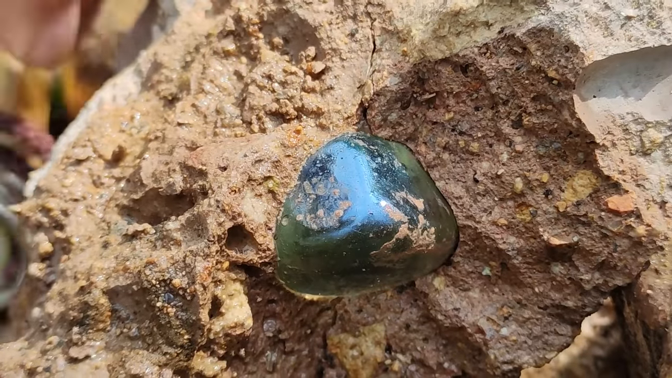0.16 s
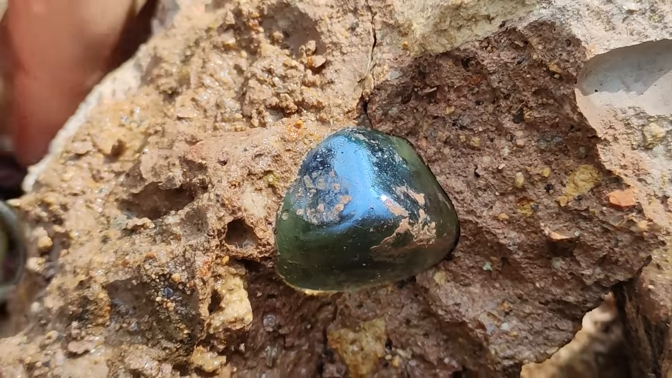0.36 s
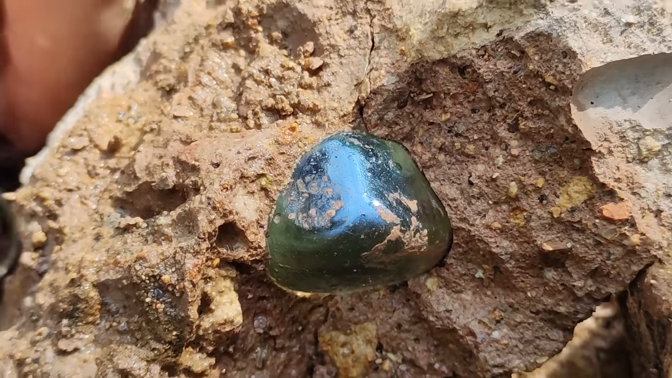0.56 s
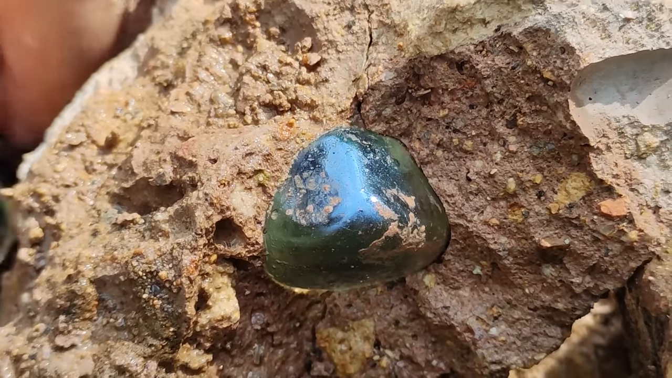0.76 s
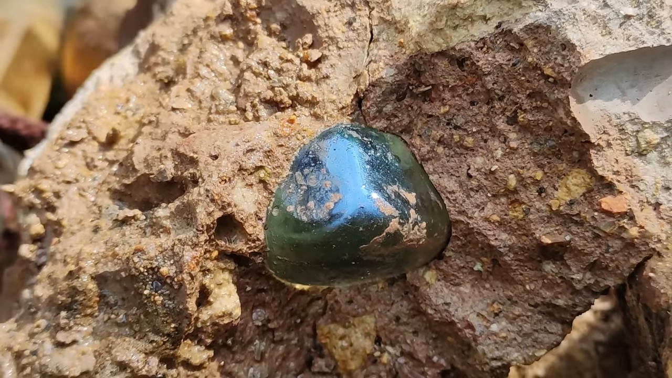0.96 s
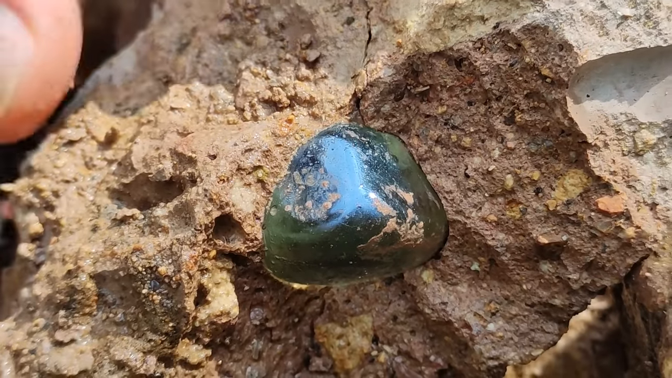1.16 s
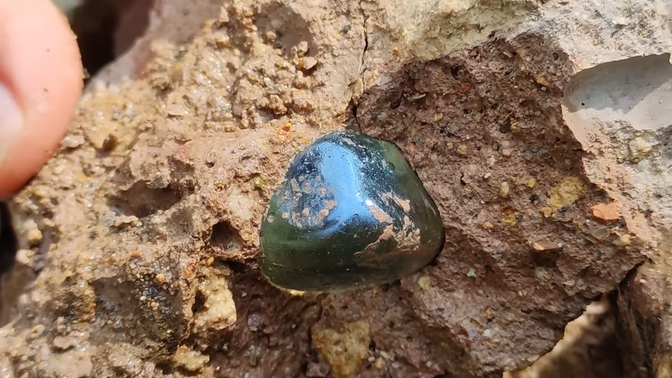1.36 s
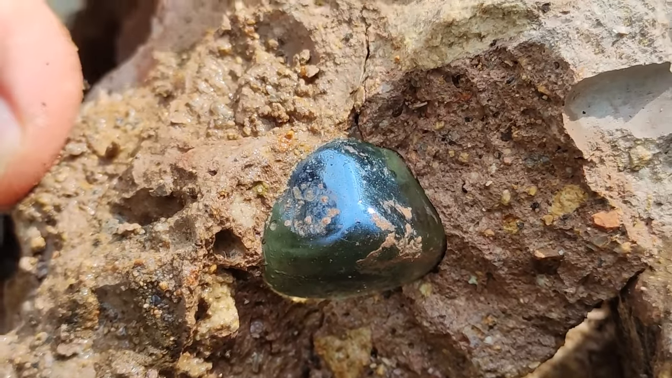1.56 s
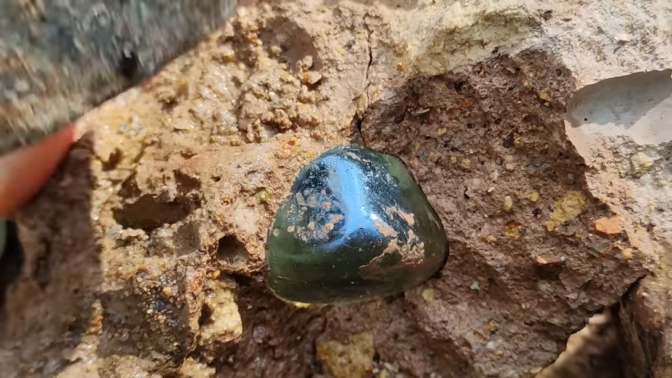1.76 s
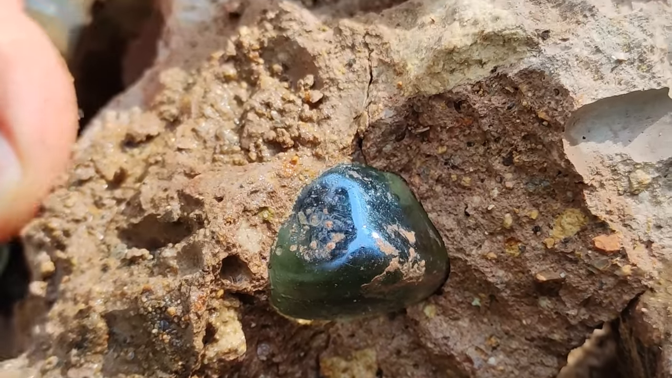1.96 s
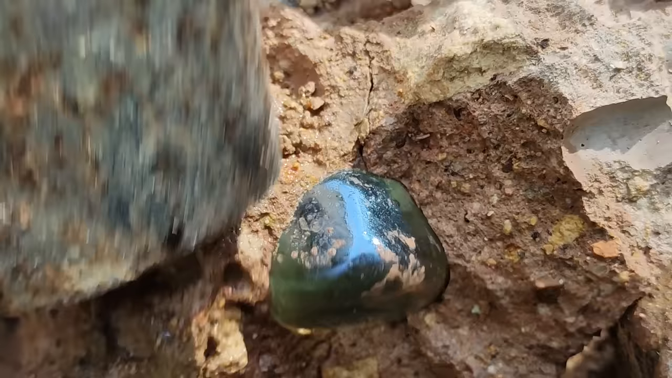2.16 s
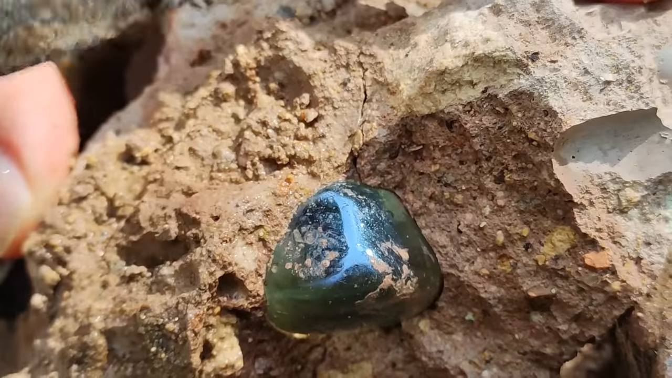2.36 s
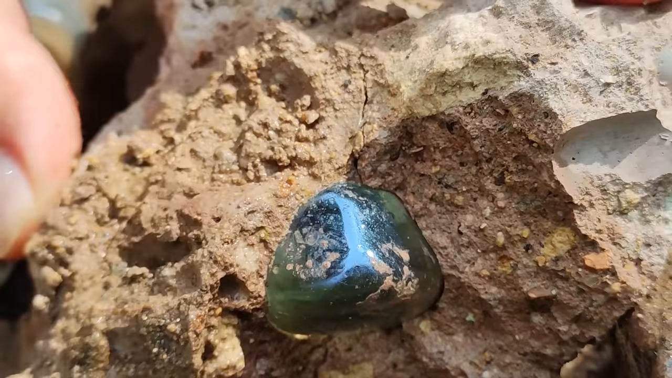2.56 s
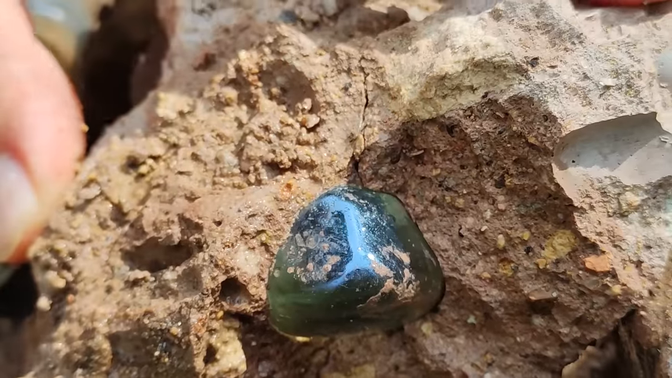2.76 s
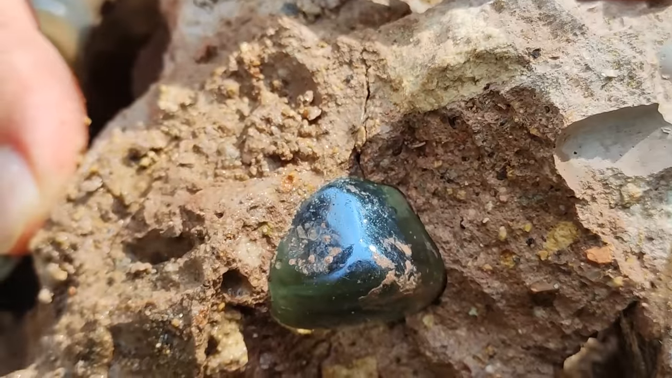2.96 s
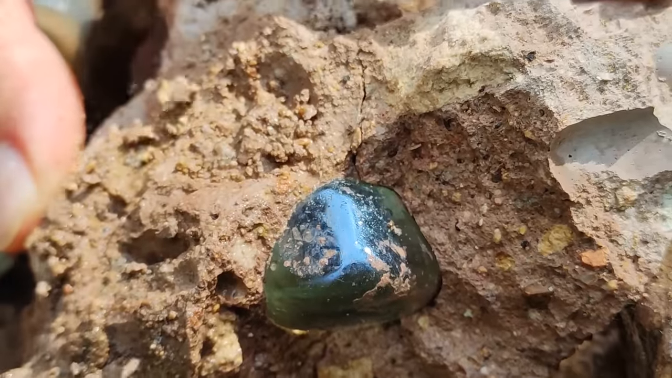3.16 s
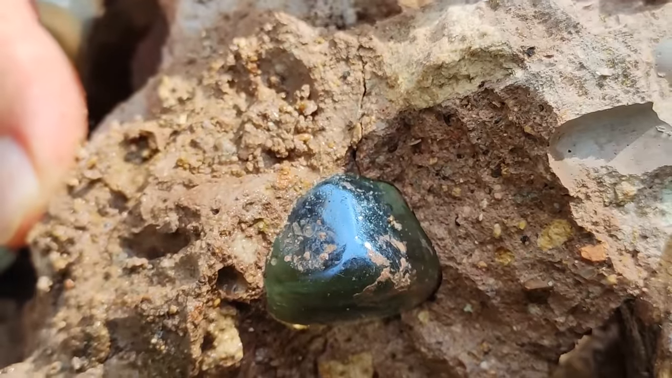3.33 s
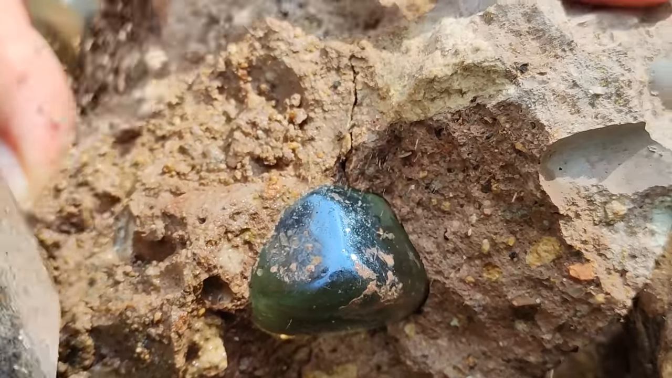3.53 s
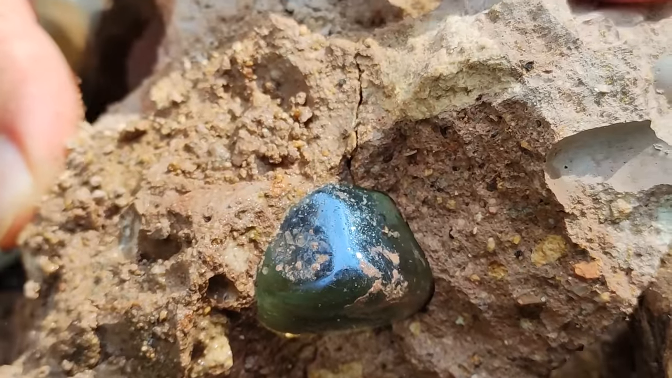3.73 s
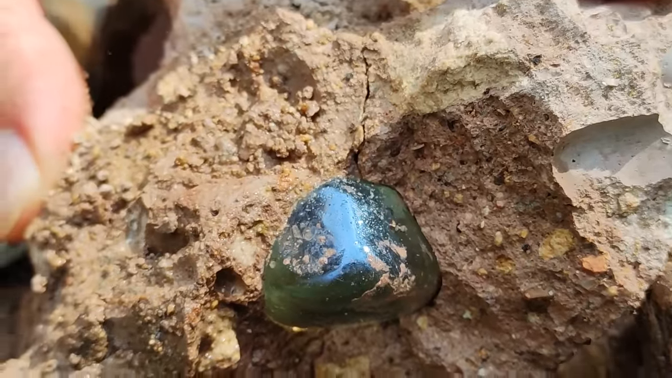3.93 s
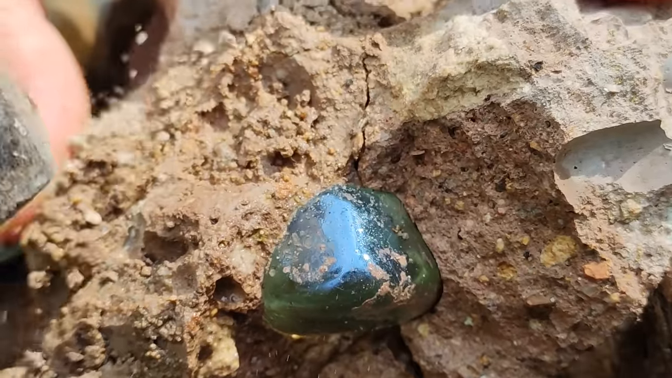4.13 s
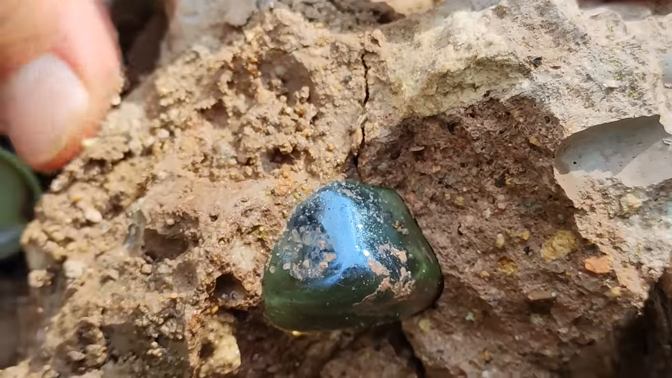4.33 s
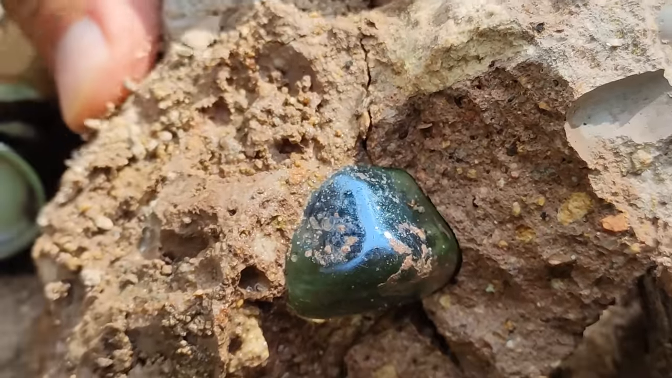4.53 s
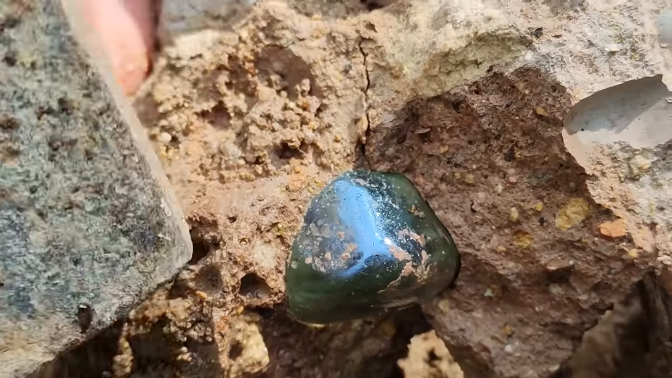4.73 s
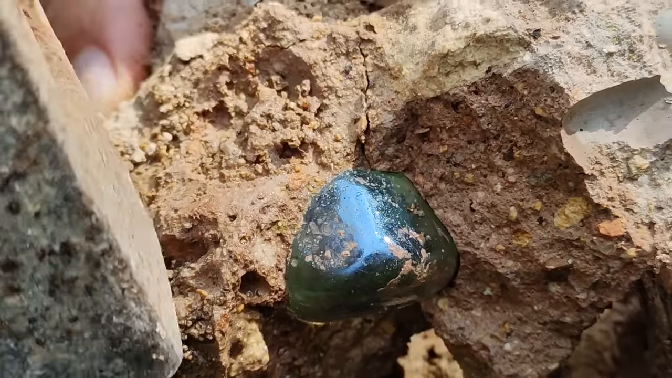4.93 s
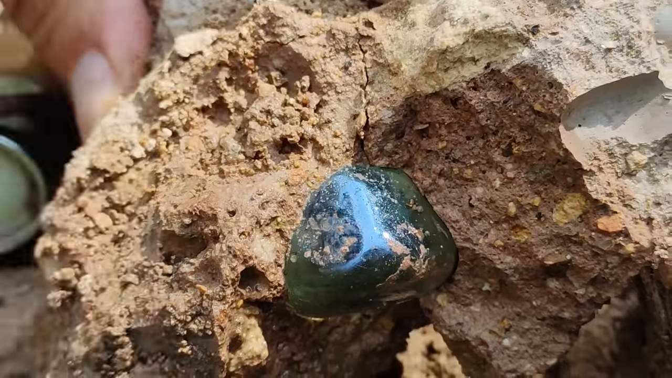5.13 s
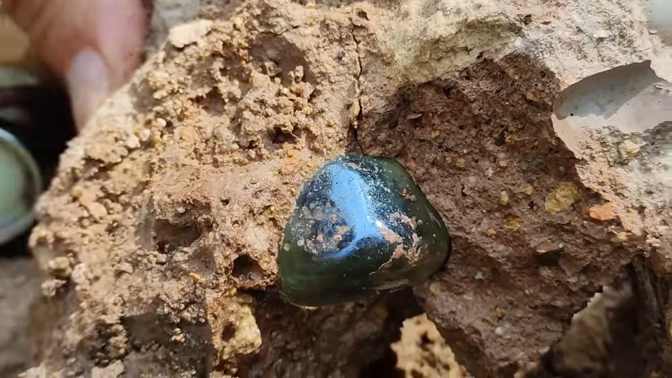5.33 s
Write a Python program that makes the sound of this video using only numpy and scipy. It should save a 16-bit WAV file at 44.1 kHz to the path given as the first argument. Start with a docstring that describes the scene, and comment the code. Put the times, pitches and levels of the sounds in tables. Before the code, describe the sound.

A steel hammer knocks repeatedly on crumbly rock outdoors, with grit and chips falling and faint birds in the distance.

```python
"""Hammer on crumbly rock

Outdoors, close to a two-port phone microphone, a steel hammer knocks on a crumbly rock held by hand.
Each blow crushes the surface, rings rock and steel, thumps the ground and sheds grit. Before the blows
something small and hard clicks. Chips fall, the hand rustles, and birds call in the distance over a
low rumble, a faint drone and an airy hiss."""
import sys
import numpy as np
from scipy import signal
from scipy.fft import rfft, irfft
from scipy.io import wavfile
from scipy.ndimage import uniform_filter1d

SR = 44100
rng = np.random.default_rng(int(sys.argv[2]) if len(sys.argv) > 2 else 0)


def store_wav(level_fs):
    """Save 16-bit WAV to argv[1]."""
    pcm = np.round(np.clip(np.atleast_2d(level_fs), -1, 1) * 32767)
    wavfile.write(sys.argv[1], SR, pcm.T.astype(np.int16))


N = 242054
T = np.arange(N) / SR
# The right port is further from the rock; long waves bend round the phone and reach it sooner.
PORT_LAG_MS, KNOCK_LAG_MS, LONG_WAVE_LAG_MS = .45, .24, .2


def undb(db):
    """Decibels to amplitude."""
    return 10 ** (np.asarray(db) / 20)


def level(x, db):
    """Set the rms level."""
    return x * undb(db) / np.sqrt(np.mean(x ** 2))


def peak(x, db):
    """Set the peak level."""
    return x * undb(db) / np.abs(x).max()


def band(x, lo_hz, hi_hz):
    """Band-pass with gentle skirts."""
    sos = signal.butter(2, [lo_hz, min(hi_hz, .45 * SR)], "bandpass", fs=SR, output="sos")
    return signal.sosfilt(sos, x)


def cut(x, order, hz, kind):
    """Gentle low-pass or high-pass."""
    return signal.sosfilt(signal.butter(order, hz, kind, fs=SR, output="sos"), x)


def coloured(points):
    """Noise whose spectrum follows (Hz, dB) points."""
    hz, db = np.transpose(points)
    f = np.maximum(np.arange(N // 2 + 1) * SR / N, 1)
    return irfft(rfft(rng.standard_normal(N)) * undb(np.interp(np.log(f), np.log(hz), db)), N)


def walk(rate, size=N):
    """Smooth wander: random values held 1 / rate s and slewed twice."""
    hold = int(SR / rate)
    steps = np.repeat(rng.standard_normal(size // hold + 1), hold)
    return uniform_filter1d(uniform_filter1d(steps, hold), hold)[:size]


def ring(push, modes):
    """A push rings decaying (Hz, dB, t60 s) modes of alternating polarity."""
    t, out = T[:len(push)], 0
    for k, (hz, db, t60) in enumerate(modes):
        mode = signal.fftconvolve(push, np.sin(2 * np.pi * hz * t) * 1000 ** (-t / t60))[:len(push)]
        out = out + (-1) ** k * level(mode, db)
    return out


def add(out, s, left, right, pan_db, lag_ms=PORT_LAG_MS):
    """Place a near sound: pan_db louder at the left port, lag_ms later at the right."""
    for ch, (x, at, db) in enumerate([(left, s, pan_db / 2), (right, s + lag_ms / 1000, -pan_db / 2)]):
        i = int(at * SR)
        n = max(min(len(x), N - i), 0)
        out[ch, i:i + n] += undb(db) * x[:n]


def crush(t, ms):
    """Contact force: loose grains yield, a sharp touch follows, the surface gives way in fading jolts."""
    fade = np.exp(-t / (ms / 1000) - (t / (1.5 * ms / 1000)) ** 4)
    jolts = rng.standard_normal(len(t)) * fade * (1 - np.exp(-(t / .0006) ** 2))
    jolts[int(.0007 * SR)] = 5.  # the sharp touch
    return jolts


def rumble():
    """A low, unsteady rumble, nearly alike at both ports."""
    # Each row: time in seconds, level in dB.
    swells = [(0.0, -54.5), (2.0, -55), (2.75, -50.5), (3.24, -49), (3.639, -52), (4.16, -47), (4.43, -52),
              (4.851, -51), (5.49, -54.5)]
    # Each row: frequency in Hz, spectral level in dB.
    colour = [(15, -49.5), (25, 2.5), (102, -3), (134, -4.5), (162, -8.5), (365, -24.5), (400, -29),
              (520, -50.5), (880, -120)]
    s, db = np.transpose(swells)
    mid, side = (level(coloured(colour), 0) for _ in range(2))
    width = undb(-14.5) * side * np.array([[1], [-1]])
    return (mid * undb(2.4 * walk(15)) + width) * undb(np.interp(T, s, db))


def drone():
    """A faint, wavering hum with a trace of its octave."""
    # Each row: time in seconds, pitch in Hz, level in dB.
    glide = [(3.1, 97, -80.5), (3.43, 106.8, -54), (3.6, 149, -55), (4.0, 143.3, -84), (4.15, 136, -50.5),
             (4.75, 131, -53.5), (4.85, 96.5, -51.5), (5.1, 97.6, -70), (5.2, 99, -81)]
    s, hz, db = np.transpose(glide)
    phase = 2 * np.pi * np.cumsum(np.interp(T, s, hz) * (1 + .016 * walk(14))) / SR
    return undb(np.interp(T, s, db) + 2 * walk(4)) * (np.sin(phase) + .043 * np.sin(2 * phase))


def air():
    """Wide outdoor hiss: long waves are alike at both ports, short ones are unrelated."""
    # Each row: frequency in Hz, spectral level in dB.
    colour = [(120, -33.5), (200, -3.5), (317, -10.5), (513, -6), (1090, -13.5), (1900, -13.5),
              (2290, -12.5), (3190, -17), (7000, -25.5), (14500, -27.5), (15600, -26), (16500, -43.5)]
    lows = cut(coloured(colour), 1, 600, "lowpass")
    highs = np.array([cut(coloured(colour), 1, 500, "highpass") for _ in range(2)])
    # each octave flickers on its own
    patchy = sum(band(highs, hz, 2 * hz) * (-1) ** k * undb(1.5 * walk(15))
                 for k, hz in enumerate(500 * 2 ** np.arange(5)))
    return level(lows + patchy, -60.5) * undb(1.2 * walk(3))


def birds():
    """Slurred, rough whistles to the right, smeared by echoes from the trees, over distant chatter."""
    # Each row: start in seconds, length in seconds, opening pitch in Hz, level at the bird in dB.
    notes = [(.01, .05, 3000, -61), (.24, .025, 4050, -62), (.255, .07, 3000, -57), (.31, .07, 3200, -60),
             (.33, .06, 2500, -59), (.39, .03, 2620, -60), (.43, .035, 2180, -60), (.635, .045, 2420, -58),
             (.9, .02, 3950, -61), (.925, .06, 2900, -59), (.97, .06, 3220, -62), (1.13, .09, 3140, -57),
             (1.22, .06, 3030, -58), (1.3, .05, 2420, -58), (1.985, .03, 3720, -60),
             (2.035, .045, 3200, -53), (2.065, .065, 2760, -55), (2.37, .025, 2470, -58),
             (2.61, .02, 3700, -61), (2.665, .035, 2490, -53), (2.705, .045, 2590, -55),
             (3.45, .08, 3100, -57), (3.705, .035, 3720, -61), (3.745, .05, 3190, -62),
             (3.78, .07, 2820, -55), (4.335, .045, 2460, -57), (4.445, .04, 3140, -59),
             (4.62, .04, 3120, -64), (4.695, .025, 2520, -60), (4.945, .035, 2100, -61),
             (5.0, .035, 2430, -59), (5.255, .04, 1580, -60), (5.32, .07, 1730, -60),
             (5.385, .045, 1430, -62)]
    # Many far birds blur into a band of noise. Each row: time in seconds, gain in dB.
    chatter = [(0.0, -53), (0.25, -56.5), (0.73, -53), (1.21, -59), (1.6, -60), (2.12, -50.5),
               (2.43, -69.5), (4.35, -76.5), (4.6, -60), (5.49, -70)]
    sag = .075  # share of its pitch that each note slides down
    whistles = np.zeros(N)
    waver, flutter = walk(200), walk(120)
    for s, length, first_hz, db in notes:
        i, t = int(s * SR), T[:int(length * SR)]
        span = slice(i, i + len(t))
        hz = first_hz * (1 - sag * t / length) * (1 + .035 * waver[span])
        swell = np.sqrt(np.sin(np.pi * t / length)) * undb(db + 5 * flutter[span])
        whistles[span] += swell * np.sqrt(2) * np.sin(2 * np.pi * np.cumsum(hz) / SR)
    t = T[:int(.3 * SR)]
    echoes = rng.standard_normal((2, len(t))) * 1000 ** (-t / .22) * undb(-33.5)
    echoes[:, 0] = .4, .62  # direct sound, left and right
    calls = np.array([signal.fftconvolve(whistles, e)[:N] for e in echoes])
    s, db = np.transpose(chatter)
    noise = rng.standard_normal((2, N))
    flock = np.array([level(band(band(x, 2100, 3000), 2100, 3000), -8.5) for x in noise])
    return calls + flock * undb(np.interp(T, s, db) + 4 * walk(14))


def rustles():
    """Skin and sand slide: short swells of grainy hiss."""
    # Each row: centre in seconds, half-length in seconds, level at the crest in dB.
    slides = [(0.184, 0.074, -55), (0.486, .18, -66), (1.243, 0.043, -49.5), (1.36, 0.096, -58),
              (1.775, 0.13, -65), (2.079, 0.14, -63), (2.219, 0.066, -59.5), (2.993, 0.044, -70.5),
              (3.432, 0.082, -66.5), (3.962, .037, -57), (4.489, 0.075, -55), (4.922, .08, -64),
              (5.022, 0.076, -64.5), (5.303, 0.043, -55)]
    out = np.zeros((2, N))
    for s, half, db in slides:
        t = T[:int(2 * half * SR)]
        grains = rng.standard_normal((2, len(t))) * undb(1.06 * rng.exponential(size=len(t)))
        grains *= undb(3.5 * walk(200, size=len(t)))  # the slide sticks and slips
        hiss = level(band(grains, 2000, 14000), db) * np.sin(np.pi * t / t[-1]) ** 2
        add(out, max(s - half, 0), *hiss, pan_db=2.)
    return out


def chips():
    """Bits of rock tick once as they land; fainter crumbs fall at random throughout."""
    # Each row: landing time in seconds, level in dB, pitch in Hz.
    landings = [(0.5683, -43, 2846), (0.6705, -46, 4200), (3.1728, -50, 9130), (3.8688, -47, 5460),
                (4.0992, -38, 3450), (4.2153, -48.5, 3630), (4.5015, -42, 2976), (4.6991, -42, 3156),
                (4.8183, -44.5, 5890), (4.8311, -37, 6200)]
    crumbs_per_s = 14
    out, t = np.zeros((2, N)), T[:int(.03 * SR)]
    chance = rng.random((int(crumbs_per_s * N / SR), 3))
    crumbs = [(when * N / SR, -66 + 10 * loud, 2000 * 3 ** high) for when, loud, high in chance]
    for s, db, hz in landings + crumbs:
        force = crush(t, ms=6.1)
        ping = peak(ring(force, [(hz, 0, .008)]), 0)
        edge = peak(band(force, 2800, 8700), -1.6)
        tick = peak(ping + edge, db)
        add(out, s, tick, tick, pan_db=2.5)
    return out


def clicks():
    """A small hard object rattles and crunches on sand; the nearer port hears more of its sharp edge."""
    # Each row: start in seconds, level in dB, then high ring and sand scrape in dB against the main ring.
    contacts = [(0.0978, -14, -19, -10.5), (0.1377, -29.5, 4, -1), (0.1458, -13.5, 7, -4),
                (0.153, -2.5, -6, 0), (0.193, -23.5, -28, 8.5), (0.216, -33.5, -22, 12.5),
                (0.2063, -22, 13, 5.5), (0.7141, -18.5, -9.5, -2), (0.8298, -13.5, -18, -14.5)]
    # The object's main ring, high ring and dull body. Each row: pitch in Hz, level in dB, t60 in seconds.
    main_modes = [(3350, 5, 0.0037), (3895, 8, 0.003), (4820, -7, 0.018), (5630, 1.5, 0.0066),
                  (6760, -9, 0.0094)]
    high_modes = [(8720, 0, .025), (9740, -8, .01), (11300, -14, .006), (13500, -16, .005)]
    body_modes = [(300, -12.5, .012), (686, -5.5, 0.012), (1282, -6.5, 0.015), (1940, -0.5, 0.011),
                  (2378, 2.5, 0.0066)]
    out, t = np.zeros((2, N)), T[:int(.08 * SR)]
    for s, db, high_db, scrape_db in contacts:
        force = crush(t, ms=3.93)
        rings = peak(ring(force, main_modes), 0) + peak(ring(force, high_modes), high_db)
        body = peak(ring(force, body_modes), db + scrape_db - 8.5)
        edge = band(force, 4500, 12670)
        drag = np.exp(-t / (.005 * undb(.39 * scrape_db)))  # a louder scrape drags longer
        ports = []
        for edge_db in (2, -42):
            sand = peak(band(rng.standard_normal(len(t)), 1800, 5000) * drag, scrape_db)
            ports.append(peak(rings + sand + peak(edge, edge_db), db))
        add(out, s, *ports, pan_db=4.5)
        add(out, s, body, body, pan_db=1.5, lag_ms=LONG_WAVE_LAG_MS)
    return out


def ground(t, blow_db):
    """The rock is driven into its bed, then springs back: the soil knocks once, the thump comes twice."""
    # Deep ground thump and the soil under the rock. Each row: pitch in Hz, level in dB, t60 in seconds.
    thump_modes = [(83.8, -3.5, 0.056), (105, -33.5, .07)]
    soil_modes = [(168, 3.5, 0.028), (254.6, 3, 0.0438), (330.6, -5, 0.015)]
    shove = np.exp(-((t - .002) / .00035) ** 2)
    rebound = .45 * np.exp(-((t - .013) / .00035) ** 2)
    thump = peak(ring(shove + rebound, thump_modes), -17 + .61 * blow_db)
    return thump + peak(ring(shove, soil_modes), blow_db - 14.5)


def grit(t, db):
    """A blow throws off fine sand and loosens coarse grit, which lands a little later."""
    grains = rng.standard_normal(len(t))
    grains *= undb(4 * rng.exponential(size=len(t)) + 6 * walk(300, size=len(t)))
    landing = .28 * np.exp(-((t - .035) / .0091) ** 2)
    coarse = level(band(grains, 900, 3600), db) * (np.exp(-t / .045) + landing)
    spray = level(band(grains, 2700, 12000), db - 10) * np.exp(-t / .024)
    return coarse + spray


def rock(force, db, knock_hz, hardness):
    """The struck rock rings, as a deep and a sharp part; a harder contact favours the upper modes."""
    # Each row: pitch in Hz, level in dB, t60 in seconds.
    modes = [(561, -17.5, 0.076), (622, -4, 0.0073), (765, -2.5, 0.0086), (980, -8, 0.0046),
             (1322, -3.5, 0.0049), (1500, -9.5, 0.002), (2186, -10.5, 0.011), (2194, -15.5, 0.013),
             (3240, -12.5, 0.0055)]
    split_hz = 1500
    struck = [(hz, mode_db + hardness * np.log2(hz / 1000), t60) for hz, mode_db, t60 in modes]
    deep = ring(force, [m for m in struck if m[0] < split_hz] + [(knock_hz, 1.5, .008)])
    sharp = ring(force, [m for m in struck if m[0] >= split_hz])
    gain = undb(db) / np.abs(deep + sharp).max()
    return gain * deep, gain * sharp


def hammer_blows():
    """Each blow cracks the surface, rings rock and hammer head, shakes the ground and sheds grit."""
    # Each row: start in seconds, level in dB, crush time in ms, knock pitch in Hz, hardness in dB per
    # octave, crack and grit in dB against the blow, level of the steel ring in dB.
    strikes = [(1.856, -26, 5.7, 630, 6.5, -5.5, -61, -68.5), (2.225, -17.5, 7, 578, 4, -3, -40.5, -56.5),
               (2.653, -6, 5.1, 1305, -4, -16, -51.5, -66.5), (3.061, -4.5, 3.5, 1258, 2, -17.5, -40, -55),
               (3.5309, 0.5, 5.23, 682, 2.2, -12, -48.5, -43),
               (4.081, -4.5, 3.7, 1186, 3, -9.5, -36, -44.5), (4.772, -10.5, 5, 631.5, 5, -8, -43.5, -57),
               (5.021, -40, 3, 621, -3.7, -14, -32, -72)]
    steel_hz, steel_t60_s = 10642, .29
    out, t = np.zeros((2, N)), T[:int(.5 * SR)]
    for s, db, crush_ms, knock_hz, hardness, crack_db, grit_db, steel_db in strikes:
        force = crush(t, crush_ms)
        deep, sharp = rock(force, db, knock_hz, hardness)
        add(out, s, deep, deep, pan_db=-1.5, lag_ms=KNOCK_LAG_MS)
        add(out, s, sharp, sharp, pan_db=1.5)
        lows = ground(t, db)
        add(out, s, lows, lows, pan_db=-1.5, lag_ms=LONG_WAVE_LAG_MS)
        steel = undb(steel_db) * np.sin(2 * np.pi * steel_hz * t) * 1000 ** (-t / steel_t60_s)
        add(out, s, steel, steel, pan_db=0, lag_ms=0)
        ports = []
        for _ in range(2):
            crack = band(force + .4 * crush(t, crush_ms), 2500, 13000) * np.exp(-t / .012)
            ports.append(peak(crack, db + crack_db) + grit(t, db + grit_db))
        add(out, s, *ports, pan_db=2.5)
    return out


def scene():
    """Close hammering and handling against the open air."""
    return hammer_blows() + clicks() + chips() + rustles() + birds() + rumble() + drone() + air()


def record(dry):
    """The phone drops the deepest bass, flattens the loudest peaks and cuts the top."""
    thin = cut(dry, 2, 45, "highpass")
    flattened = thin / (1 + thin ** 4) ** .25
    return signal.sosfilt(signal.ellip(10, .2, 80, 16400, fs=SR, output="sos"), flattened)


dry = scene()
out = record(dry)
store_wav(out)
```